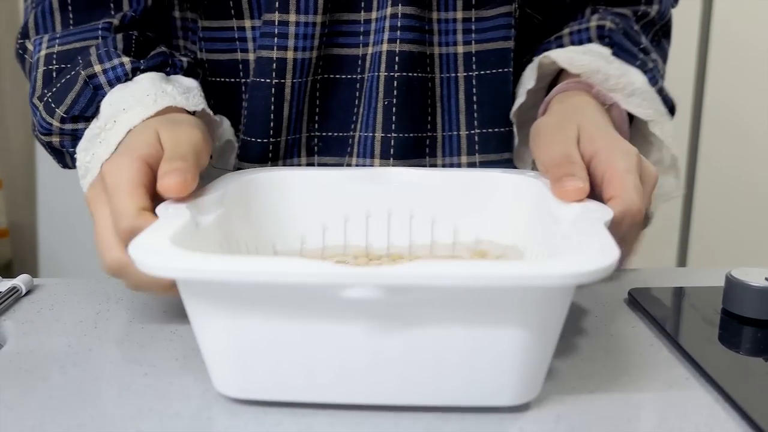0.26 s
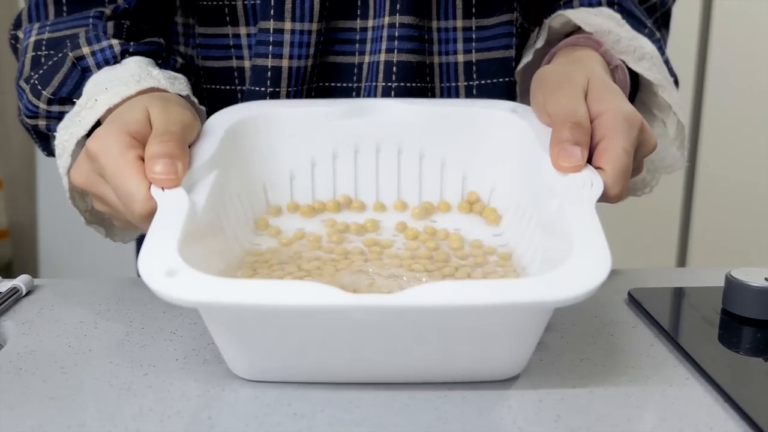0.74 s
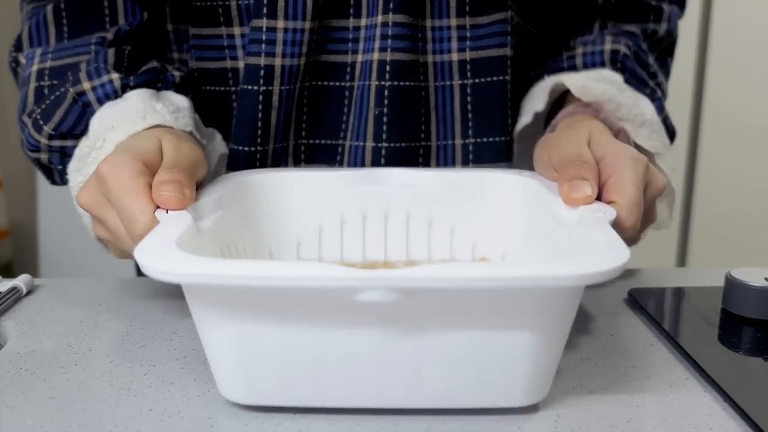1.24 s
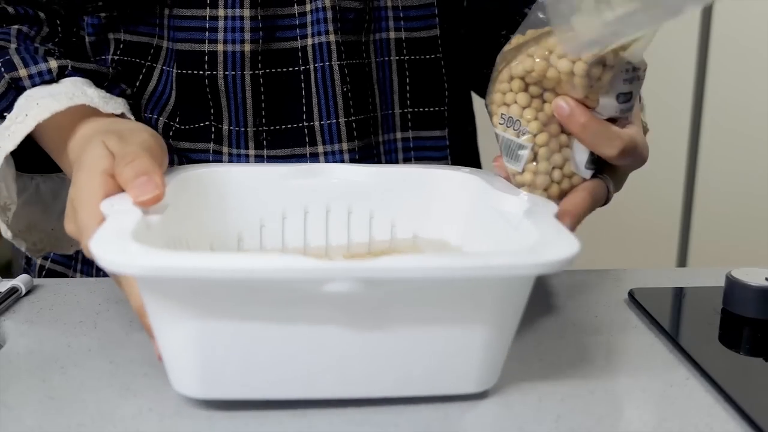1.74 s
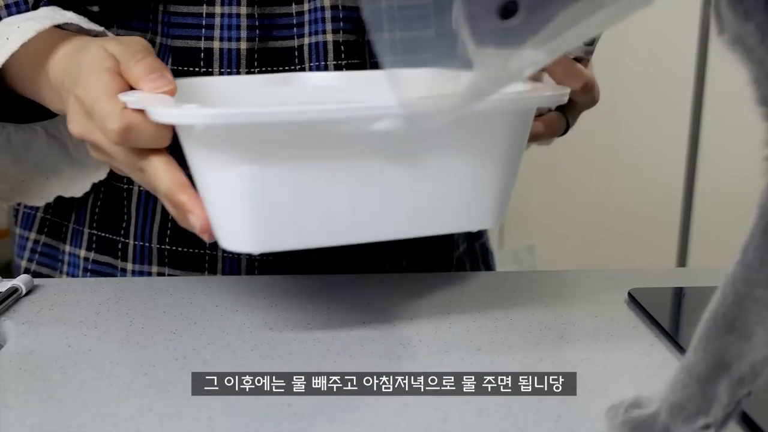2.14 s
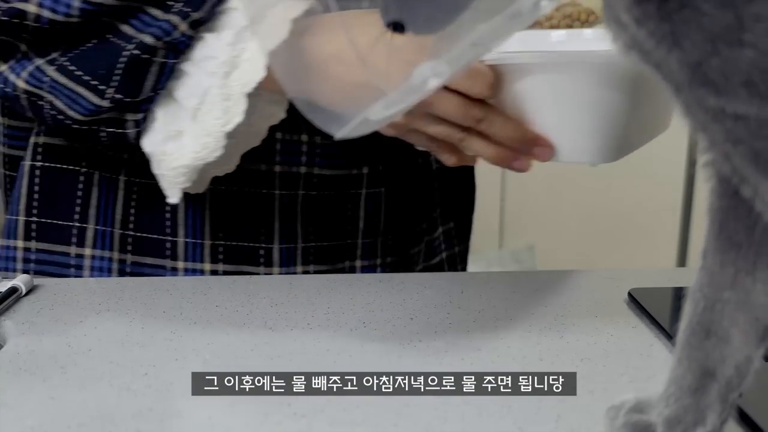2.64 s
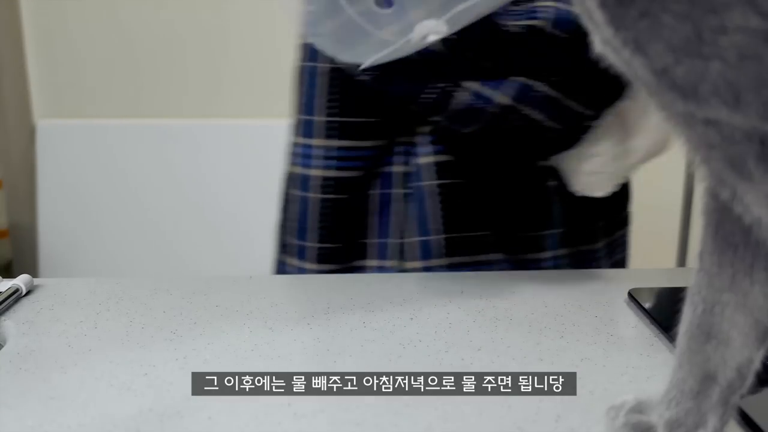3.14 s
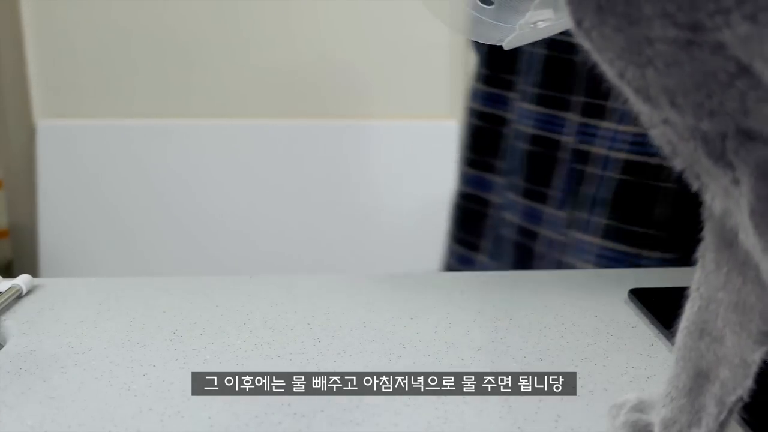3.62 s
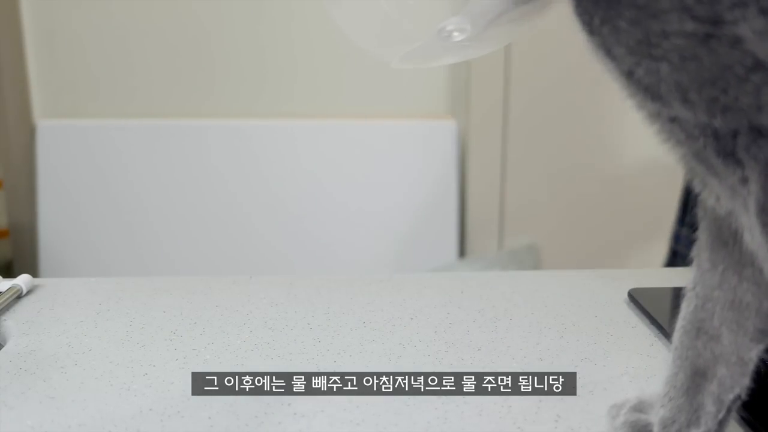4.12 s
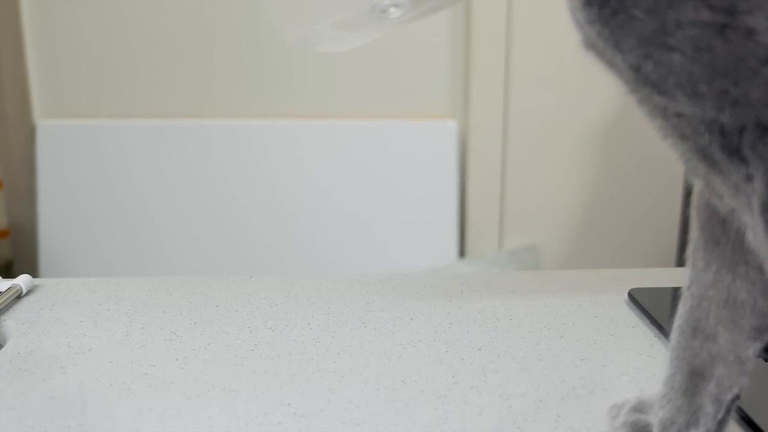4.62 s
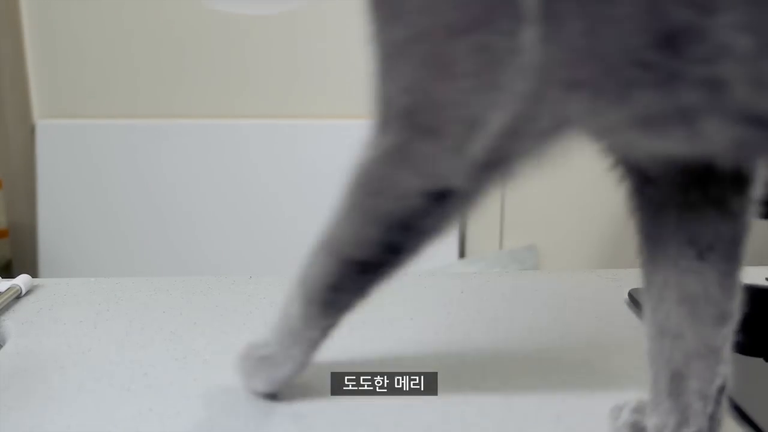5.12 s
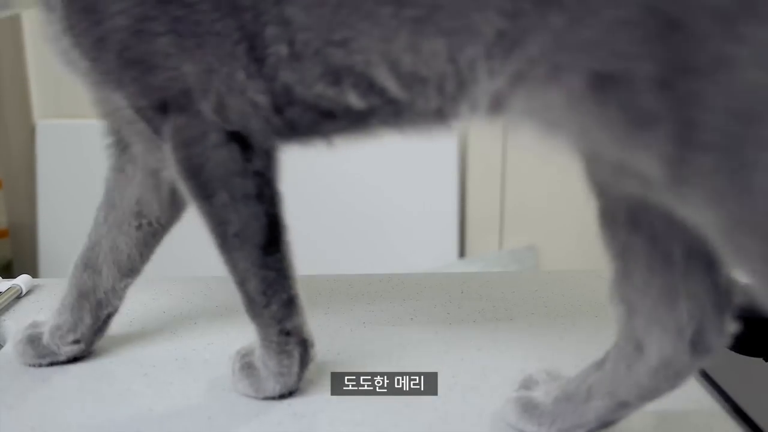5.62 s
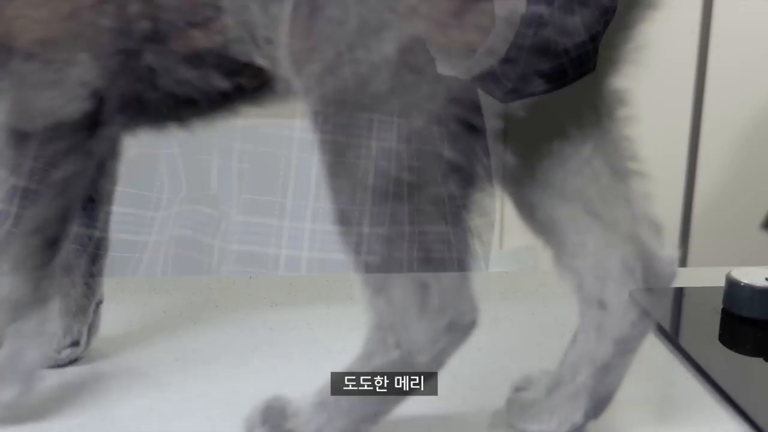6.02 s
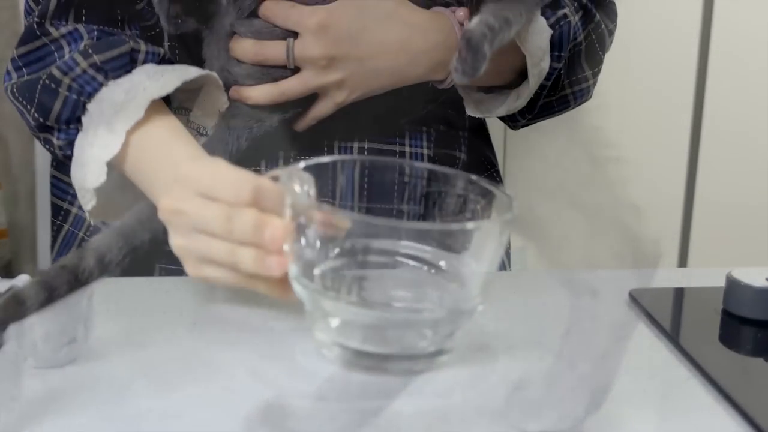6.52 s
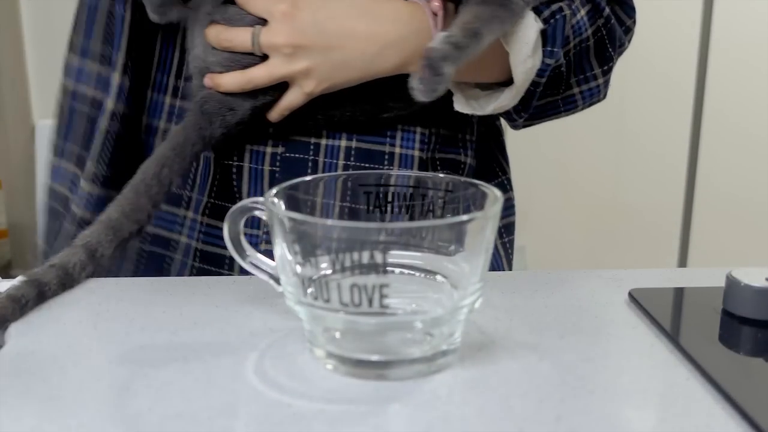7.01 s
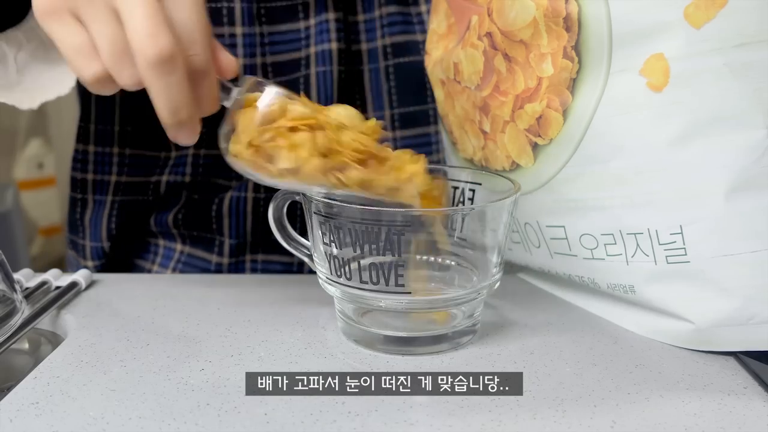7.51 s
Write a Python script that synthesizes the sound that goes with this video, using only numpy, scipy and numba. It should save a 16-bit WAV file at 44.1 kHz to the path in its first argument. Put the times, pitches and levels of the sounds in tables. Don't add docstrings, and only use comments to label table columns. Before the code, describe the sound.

In a small hard-walled kitchen with fridge hum, a close microphone catches a plastic strainer tub knocking on a stone counter while wet beans roll, tick and slosh. It is set down and carried off. Slippers scuff further away and something heavy drags. Then a glass mug lands twice with a clear ring, a bag snaps, a scoop clinks and dry flakes pour in a crisp crackle.

```python
import sys
import numpy as np
from scipy import signal
from scipy.fft import rfft, irfft, next_fast_len
from scipy.io import wavfile
from scipy.ndimage import uniform_filter1d
from numba import njit

SR = 44100
rng = np.random.default_rng(int(sys.argv[2]) if len(sys.argv) > 2 else 0)


def unload_audio(sound):
    columns = np.transpose(np.atleast_2d(sound))
    steps = np.round(np.clip(columns, -1, 1) * 32767)
    wavfile.write(sys.argv[1], SR, steps.astype(np.int16))


def ratio_of_db(decibels):
    return 10 ** (np.asarray(decibels, float) / 20)


N = 342216
T = np.arange(N) / SR
STEP = 64
OPPOSITE = np.array([[1], [-1]])


def level(x, db):
    return x * ratio_of_db(db) / np.sqrt(np.mean(x ** 2))


def peak(x):
    return x / np.abs(x).max()


def band(x, lo_hz, hi_hz, order=2):
    sos = signal.butter(order, [lo_hz, hi_hz], "bandpass", fs=SR, output="sos")
    return signal.sosfilt(sos, x)


def resonance(x, hz, width_hz):
    return band(x, hz - width_hz / 2, hz + width_hz / 2, order=1)


def at_pitch(hz, table):
    points_hz, values = np.transpose(table)
    return np.interp(np.log(hz), np.log(points_hz), values)


def colour(x, table):
    n = next_fast_len(N, True)
    hz = np.maximum(np.arange(n // 2 + 1) * SR / n, 1)
    return irfft(rfft(x, n) * ratio_of_db(at_pitch(hz, table)), n)[..., :N]


def walk(rate_hz):
    k = int(SR / rate_hz)
    held = np.repeat(rng.standard_normal(N // k + 1), k)
    return 1.37 * uniform_filter1d(uniform_filter1d(held, k), k)[:N]


def grains(rate_hz, spread_db):
    size = np.minimum(rng.exponential(size=N), 3.5)
    struck = rng.random(N) < rate_hz / SR
    return struck * ratio_of_db(spread_db * size) * rng.standard_normal(N)


def add(out, s, x):
    i = int(s * SR)
    out[i:i + len(x)] += x[:N - i]


def ring(modes, scatter_db, detune):
    hz, db, t60 = (column[:, None] for column in np.transpose(modes))
    t = T[:int(t60.max() * SR)]
    chance = rng.standard_normal((len(modes), 3))
    hz = hz * (1 + detune * chance[:, 1:2])
    swing = np.sign(chance[:, 2:]) * ratio_of_db(db + scatter_db * chance[:, :1])
    decay = np.exp(-np.log(1000) * t / t60)
    return np.sum(swing * decay * np.sin(2 * np.pi * hz * t), axis=0)


def surges(table, curve):
    s, rise, fall, db, tone_db = (column[:, None] for column in np.transpose(table))
    t = T[::STEP]
    away = np.where(t < s, (s - t) / np.maximum(rise, .001), (t - s) / np.maximum(fall, .001))
    return db - 15 * np.minimum(away, 4) ** curve, tone_db


def gain(db):
    return np.interp(T, T[::STEP], ratio_of_db(db).sum(axis=0))


# (frequency [Hz], level [dB])
AIR_COLOUR = [(15, -54), (25, 0), (102, -12.5), (600, -6.5), (2610, -15.5), (3820, -23.5), (14800, -30),
              (16000, -51)]
# (frequency [Hz], width [Hz], rms level [dB])
FRIDGE_HUM = [(121.7, 8.5, -60), (282, 90, -50), (818, 36, -58.5)]
# (start time [s], level [dB])
SHOT_AIR = [
    (0, 6),
    (1.9, 5),
    (2.5, 5),
    (3.0, 7),
    (7.09, 9),
]
# (time [s], depth [dB])
AIR_DUCKS = [
    (6.38, -31),
    (6.693, -14),
    (7.573, -2),
]


def kitchen():
    noise = rng.standard_normal((2, N))
    both = level(colour(noise, AIR_COLOUR), -49)
    both = both + sum(level(resonance(noise, hz, width), db) for hz, width, db in FRIDGE_HUM)
    shots = np.array(SHOT_AIR)
    shot_db = shots[np.searchsorted(shots[1:, 0], T), 1]
    recovery_s = 0.13
    duck_db = sum(db * (T > s) * np.exp(-np.abs(T - s) / recovery_s) for s, db in AIR_DUCKS)
    drift_db = 0.89 * walk(3.04)
    return ratio_of_db(shot_db + duck_db + drift_db - 3.5) * (both[0] + 1.01 * both[1] * OPPOSITE)


# (frequency [Hz], t60 [s])
WALL_T60 = [(125, 0.52), (500, 0.23), (2000, 0.3), (5000, 0.21), (12000, 0.15)]


def room(x):
    t, tail = T[:SR // 2], 0
    for hz in 90 * 2. ** np.arange(8):
        noise = rng.standard_normal((3, len(t)))
        shared, left, right = band(noise, hz / np.sqrt(2), hz * np.sqrt(2))
        decay = np.exp(-np.log(1000) * t / at_pitch(hz, WALL_T60))
        tail = tail + (1.19 * shared + np.array([left, right])) * decay
    tail = tail * np.clip((t - .002) / 0.0018, 0, 1)
    tail = tail / np.sqrt(np.sum(tail ** 2) / 2)
    return signal.fftconvolve(x[None], tail, axes=1)[:, :N]


# (time [s], peak level [dB], frequency [Hz])
STAND_JOLTS = [(0.778, -26, 80), (0.966, -30, 100), (1.286, -17, 90), (1.312, -6.5, 120), (1.466, -11, 131),
               (6.38, -15, 89.5), (6.693, -12, 150), (7.289, -23, 110), (7.399, -36, 100),
               (7.573, -19, 200), (7.71, -22.5, 250)]


def jolts():
    out, t = np.zeros(N), T[:SR // 8]
    for s, db, hz in STAND_JOLTS:
        swing = np.sin(2 * np.pi * hz * t) * np.exp(-t * hz / 0.38)
        add(out, s, ratio_of_db(db) * peak(swing))
    return out


# (time [s], peak level [dB])
SOFT_LOWS = [(0.95, -37), (1.448, -49), (4.518, -29), (4.599, -26), (4.858, -36), (5.178, -33.5),
             (5.748, -33), (7.095, -31), (7.27, -27.5)]


def heels():
    out, t = np.zeros(N), T[:SR // 4]
    for s, db in SOFT_LOWS:
        push = rng.standard_normal(len(t)) * t * np.exp(-t / 0.02)
        add(out, s, ratio_of_db(db) * peak(band(push, 50, 138)))
    return out


# (peak time [s], rise [s], fall [s], level [dB], brightness [dB])
CLOTH_AND_SOLES = [(3.56, 0.049, 0.04, -28.5, -17), (3.76, 0.15, 0.13, -38, -20),
                   (3.92, 0.22, 0.23, -32.5, -9), (4.25, 0.19, 0.4, -37.5, -17),
                   (4.58, 0.078, 0.045, -41, -16), (4.68, 0.15, 0.14, -30.5, -26),
                   (4.95, 0.31, 0.78, -43.5, -23), (5.34, 0.064, 0.14, -45.5, -16),
                   (6.22, 0.23, 0.13, -32, -13.5), (7.095, 0.014, 0.074, -33, -7.5),
                   (7.21, 0.0026, 0.069, -41, 7), (7.286, 0.0035, 0.057, -28.5, 11)]
# (peak time [s], rise [s], fall [s], level [dB], brightness [dB])
HEAVY_DRAG = [(5.44, 0.14, 0.038, -41, -15), (5.51, .02, 0.056, -37.5, -2), (5.6, 0.1, 0.1, -25.5, -2.5),
              (5.69, 0.099, 0.11, -28.5, 0.5), (5.78, 0.047, 0.19, -53, 0), (7.13, 0.048, 0.11, -44, -22),
              (7.23, 0.028, 0.11, -42.5, -34)]


def rustle():
    db, bright_db = surges(CLOTH_AND_SOLES + HEAVY_DRAG, curve=1.61)
    heavy = (np.arange(len(db)) >= len(CLOTH_AND_SOLES))[:, None]
    grip_db = -12 - 0.23 * bright_db + 10 * heavy
    rub = grains(12000, spread_db=1.1) * ratio_of_db(1.0 * walk(45))
    grip = band(rng.standard_normal(N), 278, 580) * ratio_of_db(2 * walk(30))
    mid = gain(db) * level(band(rub, 590, 2990), -1.25)
    treble = gain(db + bright_db) * level(band(rub, 1270, 7200), -2.3)
    return mid + treble + gain(db + grip_db) * level(grip, -0.61)


# (frequency [Hz], level [dB], t60 [s])
COUNTER_MODES = [(140, -6, 0.21), (168, -10.5, 0.3), (223, -2, 0.056), (269, 3, 0.15), (320, -5, 0.088),
                 (355, -4, 0.17), (450, 5, 0.068), (536, -0.5, 0.13), (616, -4, 0.47)]
# (time [s], peak level [dB], strongest frequency [Hz])
COUNTER_THUMPS = [(0.017, -0.5, 138), (0.039, -0.5, 213), (0.169, -8, 250), (0.223, -11, 390),
                  (0.236, 2, 273), (0.282, -10, 201), (0.78, -18.5, 195), (0.961, -22.5, 216),
                  (1.285, -4, 260), (1.304, -3, 168), (1.462, -8, 201), (1.545, -28, 300),
                  (1.764, -27.5, 330), (3.796, -27, 540), (4.275, -25.5, 287), (4.349, -22.5, 463),
                  (4.483, -21.5, 320), (4.589, -25.5, 290), (4.843, -25.5, 276), (5.184, -23, 268),
                  (5.432, -23, 600), (5.982, -27, 432), (6.378, -3.5, 255), (6.624, -9.5, 543),
                  (6.692, 0.5, 517), (7.097, -22.5, 135), (7.204, -23.5, 132), (7.284, -16, 420),
                  (7.387, -21.5, 320), (7.571, -10, 460)]


def thumps():
    out, push = np.zeros(N), np.hanning(int(0.0014 * SR))
    push = push / push.sum()
    for s, db, struck_hz in COUNTER_THUMPS:
        hands_on = not 2.0 < s < 6.2
        damping = max(1.78 + 0.07 * db + 0.54 * hands_on, .3)
        modes = [(hz, mode_db - 7 * abs(np.log2(hz / struck_hz)), t60 / damping)
                 for hz, mode_db, t60 in COUNTER_MODES]
        blow = peak(ring(modes, scatter_db=2.0, detune=0.0153))
        add(out, s, ratio_of_db(db) * np.convolve(blow, push))
    return out


# (frequency [Hz], width [Hz], level [dB])
TUB_RESONANCES = [(1340, 570, 1), (1610, 490, 3), (2640, 530, 2.5), (5000, 6500, -6)]


def walls(x):
    out = 0
    for k, (hz, width, db) in enumerate(TUB_RESONANCES):
        out = out + (-1) ** k * ratio_of_db(db) * resonance(x, hz, width) * np.sqrt(300 / width)
    return out


def knocks(table, span, low, crack_share, tub_share, ms, rise_ms, click):
    out, t_ms = np.zeros(N), T[:SR // 6] * 1000
    for s, peak_db, crack_db, hz, *own_ms in table:
        last_ms = own_ms[0] if own_ms else ms
        noise = rng.standard_normal((2, len(t_ms))) * (1 - np.exp(-t_ms / rise_ms))
        noise = noise * np.abs(noise) ** 0.61
        contact = noise[0] * np.exp(-t_ms / last_ms) + click * (np.arange(len(t_ms)) == 9)
        body = peak(band(contact, hz / span ** low, hz * span)) + tub_share * peak(walls(contact))
        crack = band(noise[1] * np.exp(-t_ms / (crack_share * last_ms)), 2230, 9600)
        add(out, s, ratio_of_db(peak_db) * (peak(body) + ratio_of_db(crack_db - 2.5) * peak(crack)))
    return out


# (time [s], peak level [dB], crack level [dB], centre [Hz], length [ms])
SLIPPER_SCUFFS = [(3.404, -25, -5.5, 1130, 20), (3.513, -18, -5.5, 2280, 15), (3.543, -18.5, -3, 2110, 19),
                  (3.711, -15.5, -23, 1210, 2.4), (3.714, -10, -25, 2140, 12), (3.793, -22.5, -6, 610, 32),
                  (3.826, -14, -14, 1360, 21), (3.83, -15, -9, 2760, 21), (3.91, -12, -10.5, 3000, 14),
                  (3.913, -16.5, -23, 1510, 12), (3.986, -20.5, -1.5, 2380, 15),
                  (4.108, -23, -17, 1510, 7.2), (4.115, -16.5, 0.5, 2460, 15), (4.191, -27, -10, 1150, 10),
                  (4.22, -15, 6.5, 2480, 19), (4.276, -16.5, -18, 1090, 13), (4.278, -15.5, 0, 2450, 20),
                  (4.347, -13, -2.5, 2080, 5), (4.383, -15, -11.5, 2600, 22), (4.482, -16, -18, 1710, 22),
                  (4.486, -23, -9, 2660, 11), (4.638, -41, -24, 1200, 12), (4.657, -17.5, -9.5, 2280, 9),
                  (4.677, -19, -13, 2700, 10), (4.705, -22.5, -8, 2210, 21),
                  (4.846, -22.5, -8.5, 1470, 8.3), (4.867, -23, -16, 1870, 4.9),
                  (5.184, -25.5, -33, 1670, 7.2), (5.277, -25, -4, 2330, 9.9), (5.373, -25, -7.5, 1980, 10),
                  (5.436, -28.5, -8, 1570, 16), (5.981, -19.5, -4.5, 2350, 2.8),
                  (6.086, -20.5, 1, 2330, 10.5)]


def scuffs():
    return knocks(SLIPPER_SCUFFS, span=1.33, low=1.42, crack_share=1.8, tub_share=0, ms=0, rise_ms=3.5, click=0)


# (time [s], peak level [dB], crack level [dB], centre [Hz])
CORNER_KNOCKS = [(0.012, -2, -40, 1410), (0.04, 0, -21, 1565), (0.168, -14, -11, 1580),
                 (0.222, 0, -27, 1750), (0.236, -0.5, -3.5, 1340), (0.777, -21, -2, 3040),
                 (0.865, -21, 5.5, 2640), (0.909, -18.5, -2, 2760), (1.207, -21, -3, 2300),
                 (1.236, -17, -30, 1620), (1.285, -4, -8.5, 1790), (1.304, -12, -1, 2550),
                 (1.43, -26, -23, 2530), (1.459, -11, -12, 1170), (1.511, -16.5, 3, 2680),
                 (1.558, -12, -1.5, 980), (1.762, -31, 3, 1670), (1.779, -31, 10, 1540),
                 (2.052, -19.5, -8, 2400), (2.056, -11, 3, 2530), (2.058, -22, -22, 1140),
                 (2.16, -22, -1, 1870), (2.244, -30, 1, 1050), (3.111, -34.5, 4, 3240)]


def tub_knocks():
    return knocks(CORNER_KNOCKS, span=1.34, low=1.0, crack_share=0.62, tub_share=0.55, ms=6.6, rise_ms=1.0, click=1.4)


# (time [s], peak level [dB], centre [Hz])
WALL_BEANS = [(0.361, -22, 1590), (0.462, -22, 1523), (0.584, -22, 1610), (0.64, -34, 2480),
              (0.813, -25, 2610), (1.049, -23, 2640), (1.113, -17.5, 2640), (1.149, -28, 2640),
              (1.668, -29, 1590), (1.804, -28, 2850), (2.379, -40, 855), (2.425, -29.5, 2100),
              (2.5, -38, 990), (1.944, -34, 2600), (2.855, -36, 2670), (2.929, -30, 2360),
              (3.147, -33, 2700)]
# (time [s], peak level [dB], centre [Hz])
STRAY_BEANS = [(0.3633, -35, 1570), (0.39, -16.5, 1310), (0.424, -20, 2510), (0.4408, -16, 2550),
               (0.4588, -34, 1620), (0.494, -21, 2640), (0.5364, -30, 2590), (0.5597, -23, 2560),
               (0.5842, -33, 2550), (0.6047, -21, 2580), (0.6395, -28, 2480), (0.6902, -25, 1300),
               (0.7445, -23, 2480), (0.7745, -24, 2640), (0.8116, -29, 2550), (0.821, -21, 2610),
               (0.8461, -26, 2200), (0.8654, -13, 2620), (0.892, -30, 2380), (0.9095, -29, 2570),
               (0.935, -32, 2510), (0.9787, -20, 1490), (1.011, -24, 1300), (1.05, -26, 2640),
               (1.112, -29, 2700), (1.1486, -22, 2640), (1.1893, -39, 2650), (1.2084, -17.5, 1290),
               (0.3153, -20, 1580), (0.4732, -20, 1550), (0.6115, -23, 2550), (0.7224, -22, 1610),
               (0.7533, -23, 2500), (0.853, -17, 1290), (1.3445, -16, 1610), (1.3821, -18, 2610),
               (1.4061, -18, 1500), (1.4436, -11, 2530), (1.5123, -17, 2640), (1.563, -25, 2640),
               (1.636, -31, 2560), (1.7126, -35, 2500), (1.7488, -29, 2430)]


def single_beans():
    ticks = [(s, db, -10, hz) for s, db, hz in WALL_BEANS]
    clicks = [(s, db - 1.5, -15, hz) for s, db, hz in STRAY_BEANS]
    hits = knocks(ticks, span=1.15, low=1.34, crack_share=0.31, tub_share=1.0, ms=7.0, rise_ms=1.0, click=3.4)
    return hits + knocks(clicks, span=1.15, low=1.25, crack_share=0.34, tub_share=1.0, ms=2.5, rise_ms=0.3, click=2.7)


# (peak time [s], rise [s], fall [s], level [dB], slosh against level [dB])
BEAN_SURGES = [(0.016, 0.0046, 0.14, -25.5, 0), (0.21, 0.045, 0.14, -30.5, -2.5),
               (0.41, 0.17, 0.2, -33.5, -19), (0.66, 0.27, 0.15, -44.5, -33),
               (0.87, 0.25, 0.19, -30.5, -15), (1.2, 0.044, 0.17, -38, -20), (1.36, 0.23, 0.51, -30.5, -16),
               (1.525, 0.08, 0.046, -29, -15), (1.575, 0.069, 0.028, -30.5, 2.5),
               (1.7, 0.085, 0.17, -44.5, -8), (2.24, 0.3, 0.35, -42, -4.5), (2.95, 0.41, 0.41, -50.5, 0)]


def beans():
    db, slosh_db = surges(BEAN_SURGES, curve=1.9)
    contact_s = 0.0013
    bumps = signal.lfilter([1], [1, -np.exp(-1 / (contact_s * SR))], np.abs(grains(1300, spread_db=2)))
    ticks = bumps * rng.standard_normal(N) * ratio_of_db(1.1 * walk(40) + .5 * walk(12))
    heap = level(resonance(ticks, 1002, 67), -13.5)
    slosh = band(rng.standard_normal(N), 110, 820) * ratio_of_db(2 * walk(25.23))
    return gain(db) * (level(walls(ticks), 1.0) + heap) + gain(db + slosh_db) * level(slosh, -0.74)


# (peak time [s], rise [s], fall [s], level [dB], body against level [dB])
FLAKE_SLIDES = [
    (7.568, 0.11, 0.006, -26, -2.5),
    (7.65, 0.16, 0.11, -34.5, -9),
    (7.715, 0.036, .6, -18.5, -9.5),
]
# (frequency [Hz], level [dB])
CRISP_COLOUR = [(1470, -36), (2500, -12), (3890, -26), (4240, -9), (6350, 2), (9220, 5.5), (14400, -2),
                (16000, -6)]


def flakes():
    db, body_db = surges(FLAKE_SLIDES, curve=1.25)
    centre, edge = (grains(20000, spread_db=3.5) * ratio_of_db(2.9 * walk(60)) for _ in range(2))
    wide = colour(centre, CRISP_COLOUR) + 0.5 * colour(edge, CRISP_COLOUR) * OPPOSITE
    body = level(band(centre, 310, 6200), -0.42)
    return gain(db) * level(wide, 0.39) + gain(db + body_db) * body


# (time [s], peak level [dB], crack level [dB], centre [Hz], length [ms])
GLASS_KNOCKS = [(6.365, -23, -14, 1910, 6), (6.379, 10.5, -16, 1540, 1.9), (6.386, -6, -19, 2100, 11),
                (6.624, -13, -34, 1330, 3.6), (6.634, -11, -44, 990, 4.5), (6.685, -5, -37.5, 820, 3.5),
                (6.691, 8.5, -33, 1560, 5.6), (6.703, -1, -34, 1500, 10), (6.711, -1.5, -40, 1690, 9.8),
                (7.093, -19.5, -3, 1590, 5.4), (7.098, -20, -25, 1560, 6.7), (7.206, -19, -1, 1240, 5.8),
                (7.275, -21, -30, 2100, 5), (7.284, 1.5, -6, 2440, 2.3), (7.292, -6, 4.5, 2780, 10),
                (7.3, -11.5, -13, 2880, 13), (7.386, -15, -13, 1820, 20.5), (7.573, 4.5, 0.5, 1490, 6),
                (7.698, -17, 2, 1520, 8.9)]


def mug_knocks():
    return knocks(GLASS_KNOCKS, span=1.36, low=1.73, crack_share=0.22, tub_share=0, ms=0, rise_ms=0.2, click=1.45)


# (frequency [Hz], level [dB], t60 [s])
GLASS_PARTIALS = [(3564, 0, .3), (5093, 3, .23), (6148, -6, .35), (7550, -13, 0.27), (8769, -18, .3),
                  (11060, -18, .27), (13500, -20, 0.12)]
# (time [s], level [dB])
GLASS_BLOWS = [
    (6.381, -54),
    (6.695, -47),
]
# (frequency [Hz], level [dB], t60 [s])
CORNER_MODES = [(1336, 0, 0.079), (1410, -15, .12), (1576, -4.5, 0.095), (2650, -8, 0.052)]
# (time [s], level [dB])
CORNER_BLOWS = [(0.013, -14), (0.039, -11), (0.223, -9.5), (0.236, -5), (1.287, -13.5)]
# (frequency [Hz], level [dB], t60 [s])
CLACK_MODES = [(3120, -11, 0.12), (4410, 2, 0.025), (4990, 5.5, 0.018), (6400, -20, 0.018),
               (8140, -8, 0.016)]
# (time [s], level [dB])
CLACK_BLOWS = [
    (6.379, -14.5),
    (6.692, -19),
    (7.573, -17),
]


def shakes():
    out = np.zeros(N)
    pairs = (GLASS_PARTIALS, GLASS_BLOWS), (CORNER_MODES, CORNER_BLOWS), (CLACK_MODES, CLACK_BLOWS)
    for modes, blows in pairs:
        for s, db in blows:
            add(out, s, ratio_of_db(db) * ring(modes, scatter_db=1.0, detune=0.0034))
    return out


# (frequency [Hz], level [dB], t60 [s])
TUB_MODES = [(150.6, 8, 0.51), (191, 15, 0.23), (271.4, 8, .3), (538, 4, 0.65), (650, -6, 0.69),
             (1620, -2, .4)]
LANDING_MODES = [(536, -4, 1), (616, -3, .25), (810, -10, .3), (904, 6, .28), (1068, -8, 0.4),
                 (1119, -8, 0.66), (1210, -8, 1), (1320, -3, .15), (1560, -11, .35), (1740, -10, .3),
                 (2073, -12, .21), (2498, -16, .2)]
SETTLING_MODES = [(350, -8, 0.3), (537, -2.5, 0.54), (608, -3, 0.42), (790, -16, .7), (920, 3, .28),
                  (1100, -11, .9), (1203, -1.5, 0.61), (1443, -6.5, .27), (1620, -10, 0.34),
                  (1655, 3, 0.34), (2000, -8, .25), (2514, -5, 0.29), (3093, -9, .58), (1836, -12, .3)]
RIM_MODES = [(536, -22, .8), (980, -5, .1), (1546, -1, .3), (1724, -4, .2), (3100, -15, .9),
             (4650, -30, .8), (5102, -13, .3), (6250, -30, .2), (8995, -32, .5)]
# (time [s], ring level [dB], slab level [dB])
TUB_BLOWS = [
    (0.039, -29, -30),
    (.225, -27.5, -37),
    (1.288, -36.5, -41),
]
LANDING_BLOWS = [
    (6.381, -19, -7),
    (6.626, -26, -26),
]
SETTLING_BLOWS = [
    (6.693, -16.5, -7.5),
]
RIM_BLOWS = [
    (7.573, -9, -21.5),
]


def mug():
    clear, side, dense = np.zeros((3, N))
    t = T[:SR // 2]
    pairs = ((TUB_MODES, TUB_BLOWS), (LANDING_MODES, LANDING_BLOWS),
             (SETTLING_MODES, SETTLING_BLOWS), (RIM_MODES, RIM_BLOWS))
    for modes, blows in pairs:
        for s, db, slab_db in blows:
            add(clear, s, ratio_of_db(db) * ring(modes, scatter_db=.5, detune=0))
            add(side, s, ratio_of_db(db - 7) * ring(modes, scatter_db=-6.0, detune=0))
            noise = rng.standard_normal(len(t))
            slab = band(noise, 390, 1090) * np.exp(-t / 0.095)
            slab = slab + 1.17 * band(noise, 1540, 1950) * np.exp(-t / 0.052)
            add(dense, s, ratio_of_db(slab_db) * peak(slab))
    return clear, side, dense


def scene():
    far = scuffs() + rustle() + heels()
    low, bright = thumps(), flakes()
    near = band(tub_knocks() + beans() + single_beans(), 30, 10400)
    clear, side, dense = mug()
    glass = mug_knocks() + dense + shakes()
    to_room = ratio_of_db(-7.0) * near + ratio_of_db(-11) * glass + ratio_of_db(-6.5) * far
    to_room = to_room + ratio_of_db(-5.0) * bright[0] + ratio_of_db(-9) * low + ratio_of_db(-16) * clear
    direct = near + glass + bright + low + clear + side * OPPOSITE + far
    return ratio_of_db(0.5) * direct + room(to_room) + jolts() + kitchen()


@njit
def follow(x, attack, release):
    out, e = np.empty(len(x)), 0.
    for i in range(len(x)):
        e += (x[i] - e) * (attack if x[i] > e else release)
        out[i] = e
    return out


def low_pass(x):
    return signal.sosfilt(signal.butter(12, 16290, fs=SR, output="sos"), x)


# (frequency [Hz], level [dB])
MIC_RESPONSE = [(30, -21), (60, -12.5), (110, -1.5), (8000, -2), (11000, -2.5), (14000, -7), (15200, -4),
                (16000, -21)]


def record(dry):
    heard = colour(dry, MIC_RESPONSE)
    attack_s, release_s = 0.0049, .25
    loudness = follow(np.abs(heard).max(axis=0), 1 / (attack_s * SR), 1 / (release_s * SR))
    duck = (np.maximum(loudness, ratio_of_db(-12.0)) / ratio_of_db(-16.0)) ** -.3
    return low_pass(np.clip(ratio_of_db(1.0) * heard * duck, -1, 1))


dry = scene()
out = record(dry)
unload_audio(out)
```